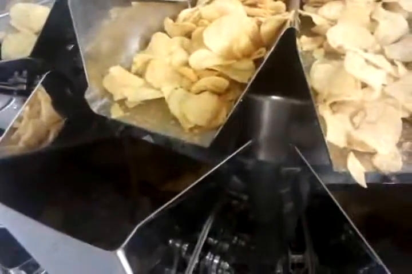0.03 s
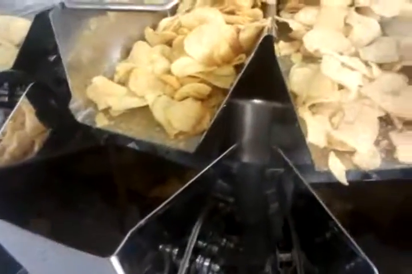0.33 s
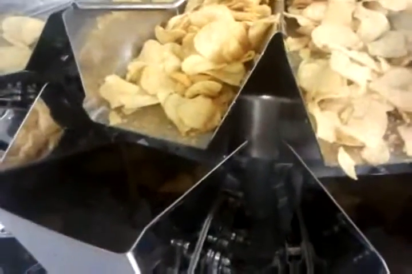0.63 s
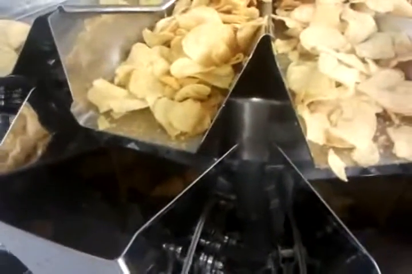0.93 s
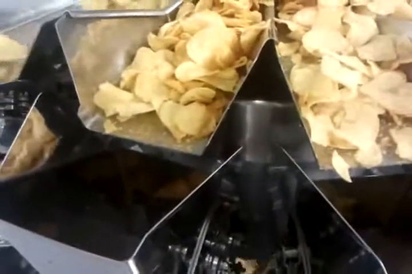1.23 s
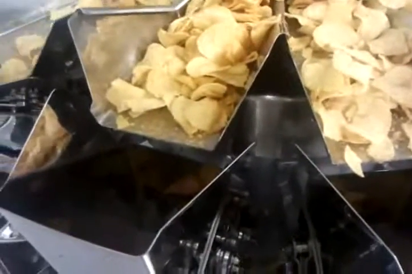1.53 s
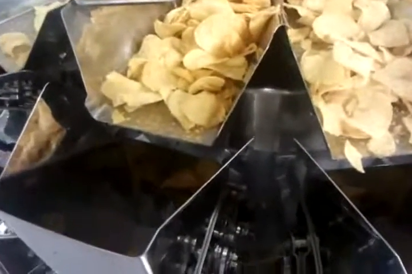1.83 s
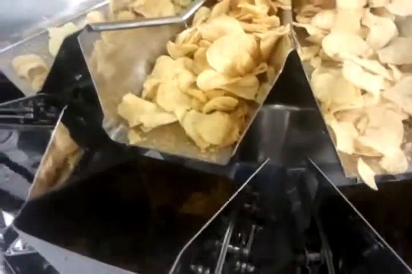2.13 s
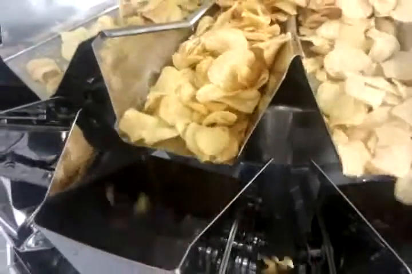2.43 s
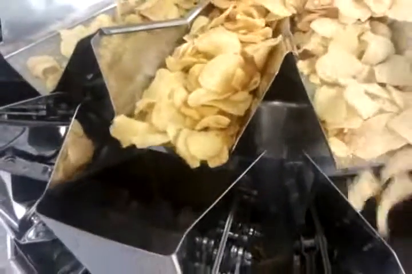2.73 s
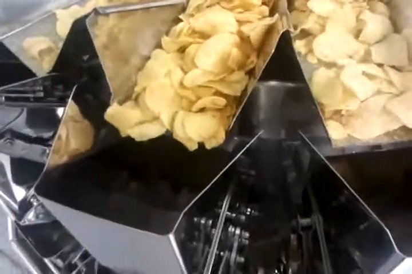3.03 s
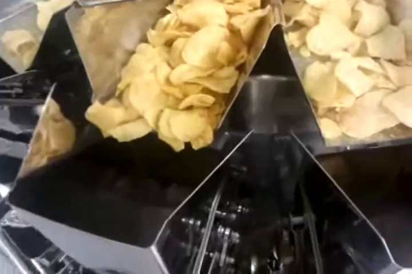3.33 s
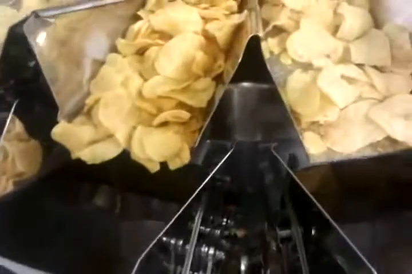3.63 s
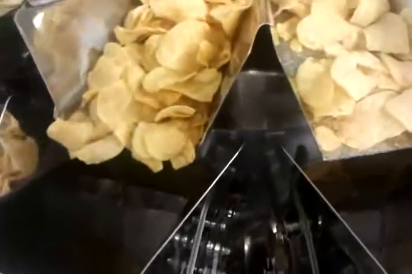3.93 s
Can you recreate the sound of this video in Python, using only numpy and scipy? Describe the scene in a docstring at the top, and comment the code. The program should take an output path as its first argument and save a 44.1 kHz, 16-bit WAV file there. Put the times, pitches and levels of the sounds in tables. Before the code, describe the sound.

A weighing machine clatters close by, dropping potato chips into steel hoppers over a low factory roar. The first second is quieter, with light clacks and scattered ticks. Louder surges come at about 1.1 to 1.6, 2.3 to 2.9 and 3.5 to 4 seconds. In each, motors growl briefly, gates clack open and shut, steel rings, and chips rattle on vibrating trays and fall in brittle showers.

```python
"""In a factory, just above the steel hoppers of a machine that weighs out portions of potato chips.
About every 1.2 s, motors growl the gates open and shut. The gates clack, the steel rings, and chips
pour in showers of tiny ticks. Underneath, chips rattle on vibrating trays and the hall roars.
A recorder that cuts off the highest sounds overloads on the loud bursts."""
import sys
import numpy as np
from scipy import signal
from scipy.fft import rfft, irfft
from scipy.io import wavfile
from scipy.ndimage import uniform_filter1d

SR = 44100
rng = np.random.default_rng(int(sys.argv[2]) if len(sys.argv) > 2 else 0)


def transcribe(u):
    """Save the signal u as a 16-bit wav file named by the first command-line argument.

    u: samples, shape (n,) or (channels, n), limited to [-1, 1]; the rate is SR.
    q: integer samples, one column per channel.
    """
    v = np.clip(np.atleast_2d(u).T, -1, 1)
    q = np.round(v * 32767).astype(np.int16)
    wavfile.write(sys.argv[1], SR, q)


N = 176400
T = np.arange(N) / SR

# Each time a gate opens and shuts: start_s, open_db, shut_db, shut_peak_delay_s, shut_tilt_db_per_octave
# (a tilt above zero makes a sound brighter, below zero duller)
GATE_CYCLES = [(-0.28, -32, -16, 0.27, -17), (1.084, -10.5, -14.5, 0.26, -1), (2.28, -20.5, -14, .29, 3),
               (3.48, -15, -12, 0.27, 6)]
# Pitches the gate drive favours when opening and when shutting: pitch_hz, width_hz, level_db
OPENING_RESONANCES = [(468.5, 11.4, -8.5), (447, 32, -5.5), (369, 20, -18)]
SHUTTING_RESONANCES = [(386, 37, 2), (464.5, 21, 1), (534.6, 54, 2.5), (601.6, 26, -4.5), (720, 61, -28),
                       (902, 20, -15.5)]
# Batches of falling chips: start_s, length_s, level_db, tilt_db_per_octave
CHIP_POURS = [(0.254, 0.032, -22, -2), (0.34, 0.0082, -21.5, 0.5), (0.527, 0.023, -30.5, 4),
              (0.572, 0.036, -27, -0.5), (.748, .03, -24, 3), (0.78, 0.022, -12, 2), (0.795, .014, -22, -3),
              (0.952, 0.058, -31, -8), (1.125, 0.043, -10.5, 0.5), (1.272, 0.029, -18.5, 8),
              (1.325, 0.035, -8, -3), (1.419, 0.023, -11, 2), (1.513, 0.063, -17, -3),
              (1.749, 0.027, -17.5, 0), (1.781, 0.028, -17.5, 1.5), (1.924, 0.034, -19.5, 3),
              (2.177, 0.011, -15, -1), (2.234, 0.054, -17.5, 3), (2.286, 0.076, -9.5, 0.5),
              (2.335, 0.035, -8.5, -0.5), (2.455, 0.015, -6.5, 2.5), (2.539, 0.046, -4, -.5),
              (2.656, 0.037, -18, 2), (2.771, 0.018, -15.5, 1), (2.874, .02, -14, 2.5),
              (3.063, 0.037, -16.5, 2.5), (3.182, 0.037, -23, 1), (3.294, 0.097, -25.5, 3),
              (3.534, 0.034, -9, -1.5), (3.659, 0.018, -10.5, 0.5), (3.737, 0.047, -7.5, -2),
              (3.857, .018, -17, -4), (3.923, 0.04, -17.5, 1)]
# Knocks of gates and their links: start_s, level_db, tilt_db_per_octave, rise_ms
GATE_CLACKS = [(0.0778, -13, 3, .2), (0.0985, -12.5, -1, 0.18), (0.1036, -8, -2, .3), (.13, -17, 2, .5),
               (.138, -17, 4, .3), (0.227, -15, 1, .3), (0.258, -18, 3, 1), (0.737, -14.5, 5.5, 4.1),
               (1.009, -14.5, -1, 1.8), (1.0828, -13, 4, 2.4), (1.096, -14, 2, 3.3), (1.243, -12, 4, 2),
               (1.251, -8, 1, 2.3), (1.3245, -4.5, 2, 2), (1.5049, -3, -1, 0.32), (1.5837, -3.5, -2, 2.5),
               (1.594, -7, -4, 1.5), (1.7388, -12.5, -3.5, 3), (2.173, -16.5, -4, 3.3),
               (2.2275, -12.5, 1.5, 2.6), (2.2865, -7, -1.5, 3), (2.5407, -5.5, 5, 1.5),
               (2.7168, -9.5, -3, 0.79), (2.8438, -17, 1, 1.7), (2.886, -10, 0, 1.7), (3.0131, -15.5, 3, 3),
               (3.054, -10, 2.5, .3), (3.069, -7, -2, 1), (3.1338, -15, -3, .5), (3.264, -17, -1, .3),
               (3.4181, -14.5, -2, 1.8), (3.4979, -11, -3, 3), (3.6637, -8, -1, 2.4), (3.735, -6.5, -3, 2),
               (3.8609, -9, -6.5, 3), (3.957, -14.5, 1, 4.6)]
# Notes of a steel hopper: pitch_hz, level_db, fade_s (a fade is the time to drop by 60 dB)
HOPPER_NOTES = [(1043, -2, 0.23), (1142, -7.5, 0.52), (1513, -10, 0.35), (1800, -9, .38), (2218, -5, .25),
                (2427, 7.5, 0.23), (2923, -10, .25)]
# Blows that ring the hopper: start_s, level_db
HOPPER_BLOWS = [(1.335, -22), (1.505, -13), (1.588, -20), (2.345, -32), (2.56, -14.5), (3.742, -22)]
# Pings of loose steel parts and dull thumps in the frame: start_s, pitch_hz, level_db, fade_s
STEEL_PINGS = [(.0772, 3500, -15, .04), (0.2266, 1135, -24, 0.34), (1.252, 2020, -8, 0.086),
               (1.283, 3480, -11, .08), (1.355, 915, -14, 0.17), (1.362, 1775, -12, 0.15),
               (1.59, 1785, -11.5, 0.32), (1.758, 2690, -15, .12), (1.757, 2556, -14, 0.17),
               (1.795, 1150, -14.5, 0.13), (2.288, 2045, -14, 0.13), (2.29, 4050, -11, 0.21),
               (2.366, 4120, -5.5, .17), (2.464, 2410, -8, 0.097), (2.543, 4010, -6, 0.092),
               (3.094, 4770, -13.5, 0.1), (3.094, 3461, -13, 0.081), (3.094, 6150, -24, .14),
               (3.864, 2450, -10, 0.11)]
FRAME_THUMPS = [(1.61, 154, -18, 0.42), (2.36, 48.3, -24, .4), (2.39, 153.7, -19.5, .25),
                (2.499, 58, -20, 0.45), (2.77, 62, -24.5, 0.63), (3.495, 64.4, -18.5, 0.65)]
# How loud the tray rattle and the roar of frame and hall are over time: time_s, level_db
RATTLE_LEVELS = [(0, -34), (.2, -36), (.42, -37), (.9, -30.5), (1.07, -23.5), (1.17, -16), (1.47, -17),
                 (1.68, -26.5), (2.0, -23.5), (2.09, -32), (2.2, -28), (2.4, -13), (2.62, -17), (2.85, -20),
                 (2.99, -24.5), (3.36, -23), (3.47, -25.5), (3.62, -23), (3.83, -15.5), (4, -21)]
ROAR_LEVELS = [(0, -25), (.4, -25.5), (.9, -25.5), (1.3, -17.5), (1.65, -19.5), (2.08, -24), (2.45, -17.5),
               (2.85, -20), (3.3, -24), (3.7, -17), (4, -21)]
# Pitches at which the steel trays ring and the frame drones: pitch_hz, width_hz, level_db
TRAY_RESONANCES = [(2460, 30, 0), (2940, 25, -3), (3240, 25, -5), (3590, 25, -4), (3885, 30, -3),
                   (4107, 20, -4), (4921, 20, -9), (6126, 20, -9)]
FRAME_RESONANCES = [(117.8, 14.6, -6.5), (212.5, 15.4, -4.5), (262.3, 17.6, -0.5)]
# Each sound's colour, meaning its balance of low and high: pitch_hz, level_db
POUR_COLOUR = [(100, -42), (400, -10), (800, -3), (1300, -5), (1900, 1), (2450, 0.5), (3100, -3), (4000, 0),
               (5000, -7.5), (6300, -9), (7500, -17.5)]
KNOCK_COLOUR = [(100, -40), (400, 1), (1100, -4), (2100, 10), (2600, 9.5), (3600, 9.5), (4900, 1),
                (7500, -4)]
RATTLE_COLOUR = [(100, -18), (400, 8.5), (800, -2), (1300, -5), (1900, 0), (2450, 3.5), (3100, -1.5),
                 (4000, -4), (5000, -8.5), (6300, -5), (7500, -13.5)]
ROAR_COLOUR = [(20, -19), (40, -13), (62, -5.5), (85, -8), (125, -3.5), (200, -2), (280, -6), (450, -3.5),
               (750, -7.5), (1200, -8.5), (2500, -8.5), (4000, -10.5), (7500, -20.5)]
TICK_PITCHES_HZ = np.linspace(400, 8000, 32)


def gate_motors():
    """The motors give a wavering tone with chatter as a gate opens, and a wider growl as it shuts."""
    motor_hz, wobble_depth, tone_db = 468, 0.011, -6
    far_lead_s, far_db = 0.05, -29
    wobble = unit(uniform_filter1d(rng.standard_normal(N), size=600))
    pitch_hz = motor_hz * (1 + wobble_depth * wobble)
    tone = unit(np.sin(2 * np.pi * np.cumsum(pitch_hz) / SR))
    chatter = tiny_hits(N, per_s=1500, spread_db=1)
    opening = unit(resonate(chatter, OPENING_RESONANCES) + amp(tone_db) * tone)
    out = np.zeros(N)
    for start_s, open_db, shut_db, delay_s, tilt in GATE_CYCLES:
        tilted = [(hz, width, db + tilt * np.log2(hz / motor_hz))
                  for hz, width, db in SHUTTING_RESONANCES]
        growl = resonate(chatter[::-1], tilted)
        out += amp(open_db) * swell(peak_s=start_s + 0.087, rise_s=0.033, fall_s=0.057) * opening
        out += amp(shut_db) * swell(peak_s=start_s + delay_s, rise_s=0.058, fall_s=0.068) * growl
        # A gate on the far side moves just before each cycle.
        out += amp(far_db) * swell(peak_s=start_s - far_lead_s, rise_s=0.058, fall_s=0.057) * growl
    return out


def chip_pours():
    """Each batch of chips hits the steel as a thick shower of brittle ticks and dry crackle."""
    rise_s, fall_s = 0.009, 0.016
    out, t, n = np.zeros(N), T[:SR // 5], 2 * SR
    ticks = unit(chip_ticks(n, per_s=8000, fade_s=0.016))
    crackle = unit(tiny_hits(n, per_s=8000, spread_db=3.8))
    shower = ticks + crackle
    for start_s, length_s, db, tilt in CHIP_POURS:
        shape = np.minimum(t / rise_s, 1) * np.exp(-np.maximum(t - length_s, 0) / fall_s)
        batch = shower[rng.integers(n - len(t)):][:len(t)]
        add(out, start_s, amp(db) * shape * coloured(batch, POUR_COLOUR, tilt))
    return out


def gate_clacks():
    """Gates and links knock: a sharp crack with a brief tail, and a clink from the part that is hit."""
    crack_fall_s, tail_fall_s, tail_db = 0.0025, 0.029, -16.5
    clink_db, clink_fade_s = -5.5, 0.067
    out, t = np.zeros(N), T[:SR // 4]
    for start_s, db, tilt, rise_ms in GATE_CLACKS:
        rise_s = rise_ms / 1000
        since_peak = np.maximum(t - rise_s, 0)
        shape = np.exp(-since_peak / crack_fall_s) + amp(tail_db) * np.exp(-since_peak / tail_fall_s)
        crack = shape * coloured(rng.standard_normal(len(t)), KNOCK_COLOUR, tilt)
        notes = sum(np.sin(2 * np.pi * hz * t) for hz in rng.uniform(1005, 6500, size=10))
        clink = amp(clink_db - 60 * since_peak / clink_fade_s) * coloured(notes, KNOCK_COLOUR, tilt)
        add(out, start_s, amp(db) * np.minimum(t / rise_s, 1) * (crack + clink))
    return out


def ringing_steel():
    """After a blow, hopper walls ring, loose parts ping and the heavy frame thumps."""
    out = np.zeros(N)
    for start_s, db in HOPPER_BLOWS:
        add(out, start_s, amp(db) * sum(ring(*note) for note in HOPPER_NOTES))
    for start_s, *note in STEEL_PINGS:
        add(out, start_s, ring(*note))
    for start_s, *note in FRAME_THUMPS:
        add(out, start_s, ring(*note, rise_s=0.013))
    return out


def tray_rattle():
    """Chips hop on the vibrating trays and set the steel ringing."""
    shake_hz, shake_depth, ring_db = 39.16, 0.17, -9
    shake = 1 + shake_depth * np.sin(2 * np.pi * shake_hz * T)
    ticks = chip_ticks(N, per_s=4500, fade_s=0.0084) * shake
    steel = amp(ring_db) * resonate(ticks, TRAY_RESONANCES)
    return level(RATTLE_LEVELS) * unit(coloured(ticks, RATTLE_COLOUR) + steel)


def hall_roar():
    """The roar of distant machines rises and falls over the steady drone of the frame."""
    roar = level(ROAR_LEVELS) * coloured(rng.standard_normal(N), ROAR_COLOUR)
    drone = amp(-32) * resonate(rng.standard_normal(N), FRAME_RESONANCES)
    return roar + drone


def steel_walls(x):
    """The steel walls all around add a short, thick echo."""
    fade_s, echo_db = 0.11, -4.5
    t = T[:SR // 2]
    tail = rng.standard_normal(len(t)) * amp(-60 * t / fade_s)
    echo = signal.fftconvolve(x, tail / np.linalg.norm(tail))[:N]
    return (x + amp(echo_db) * echo) / np.hypot(1, amp(echo_db))


def chip_ticks(n, per_s, fade_s):
    """Chips strike at random, and each tick is a very short note."""
    out = np.zeros(n)
    for hz in TICK_PITCHES_HZ:
        hits = tiny_hits(n, per_s / len(TICK_PITCHES_HZ), spread_db=3)
        tick = ring(hz, 0, fade_s, rise_s=0.00021, length_s=fade_s)
        out += signal.oaconvolve(hits, tick)[:n]
    return out


def tiny_hits(n, per_s, spread_db):
    """Scatters clicks over n samples; more spread makes their sizes more uneven."""
    place, chance, sign = rng.random((round(per_s * n / SR), 3)).T
    size_db = spread_db * np.minimum(-np.log(1 - chance), 4)
    return np.bincount((place * n).astype(int), amp(size_db) * np.sign(sign - 0.5), n)


def ring(hz, db, fade_s, rise_s=0.0004, length_s=1):
    """One pure note that dies away."""
    t = T[:round(length_s * SR)]
    shape = amp(db - 60 * t / fade_s) * (1 - np.exp(-t / rise_s))
    return shape * np.sin(2 * np.pi * (hz * t + rng.random()))


def resonate(x, resonances):
    """Keeps mostly the sound near the listed pitches, at strength 1."""
    all_hz = np.fft.rfftfreq(N, 1 / SR)
    gain = sum(amp(db) / np.sqrt(width) / (1 + 1j * (all_hz - hz) / width) ** 2
               for hz, width, db in resonances)
    return unit(irfft(rfft(x) * gain, N))


def coloured(x, colour, tilt=0):
    """Gives x a colour and a tilt, with nothing above 8000 Hz, at strength 1."""
    octave = np.log2(np.fft.rfftfreq(len(x), 1 / SR) + 1)
    hz, db = np.transpose(colour)
    gain = amp(np.interp(octave, np.log2(hz), db) + tilt * octave)
    return unit(irfft(rfft(x) * gain * (octave < np.log2(8000)), len(x)))


def swell(peak_s, rise_s, fall_s):
    """A smooth rise and fall in loudness."""
    width_s = np.where(T < peak_s, rise_s, fall_s)
    return 1 / np.cosh(np.clip((T - peak_s) / width_s, -20, 20))


def amp(db):
    """Turns decibels into a number to multiply by."""
    return 10 ** (np.asarray(db) / 20)


def unit(x):
    """Scales x to an average strength (root mean square) of 1."""
    return x / np.sqrt(np.mean(x ** 2) + 1e-20)


def level(points):
    """Joins (time_s, level_db) points into a volume curve."""
    return amp(np.interp(T, *np.transpose(points)))


def add(mix, start_s, sound):
    """Mixes a sound in at its start time."""
    part = mix[max(round(start_s * SR), 0):][:len(sound)]
    part += sound[:len(part)]


def scene():
    """All the sounds meet at one microphone."""
    machinery = hall_roar() + gate_motors() + ringing_steel()
    clatter = tray_rattle() + chip_pours() + gate_clacks()
    return (machinery + steel_walls(clatter))[None]


def record(dry):
    """The recorder squashes loud peaks and uses a low sample rate, which loses the highest sounds."""
    ceiling, hardness = 0.59, 3.8
    recorder_hz, input_cut_hz, output_cut_hz = 16000, 7315, 13900
    squashed = dry[0] / (1 + abs(dry[0] / ceiling) ** hardness) ** (1 / hardness)
    input_filter = signal.firwin(101, input_cut_hz, window=("kaiser", 6), fs=SR)
    dulled = signal.oaconvolve(squashed, input_filter, "same")
    stored = signal.resample(dulled, N * recorder_hz // SR)
    # Joining the samples with straight lines adds a faint mirror image of the treble higher up.
    played = np.interp(T, np.arange(len(stored)) / recorder_hz, stored)
    output_filter = signal.firwin(301, output_cut_hz, window=("kaiser", 9), fs=SR)
    return signal.oaconvolve(played, output_filter, "same")[None]


dry = scene()
out = record(dry)
transcribe(out)
```